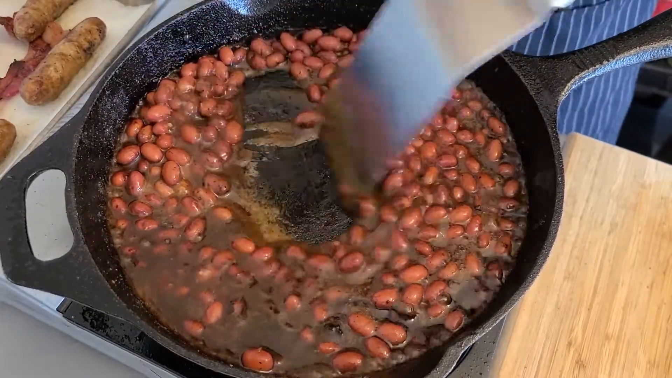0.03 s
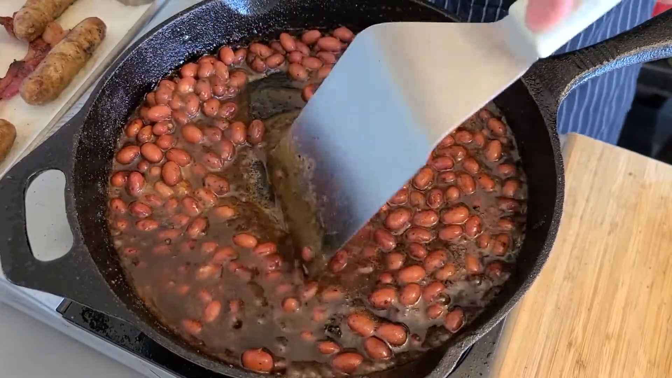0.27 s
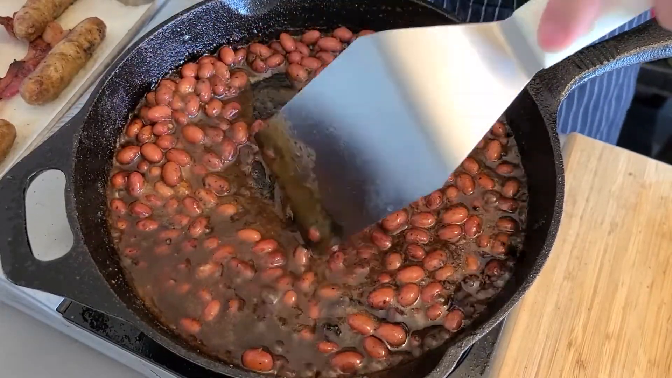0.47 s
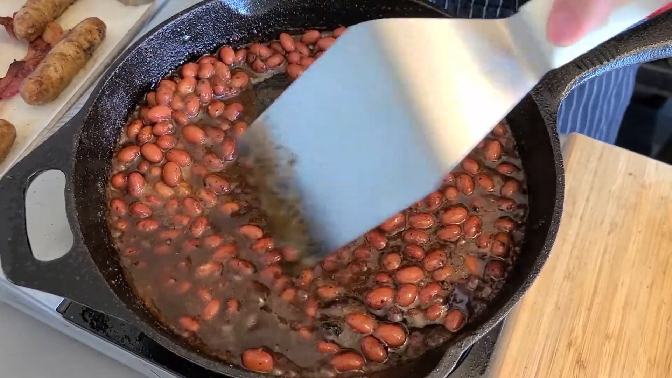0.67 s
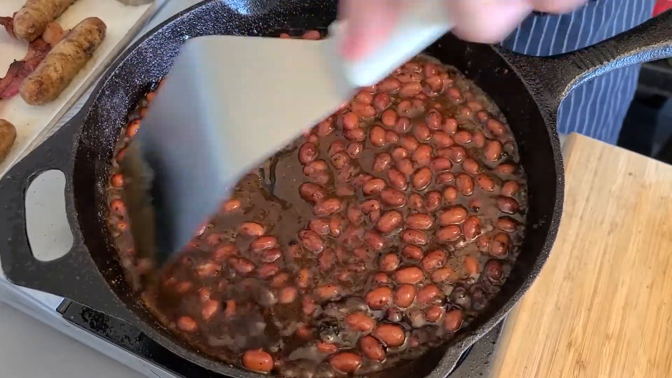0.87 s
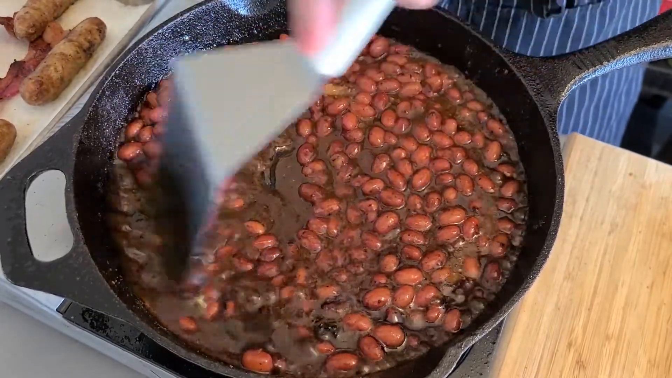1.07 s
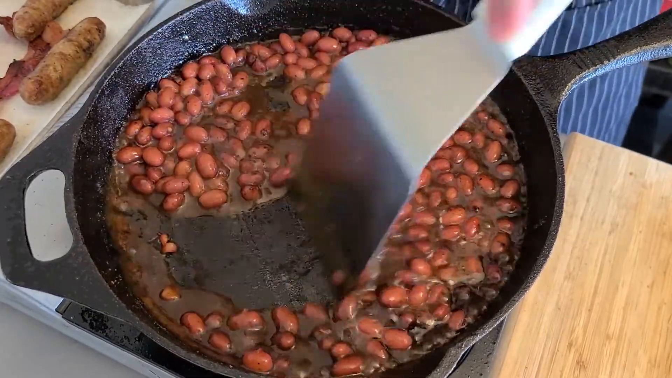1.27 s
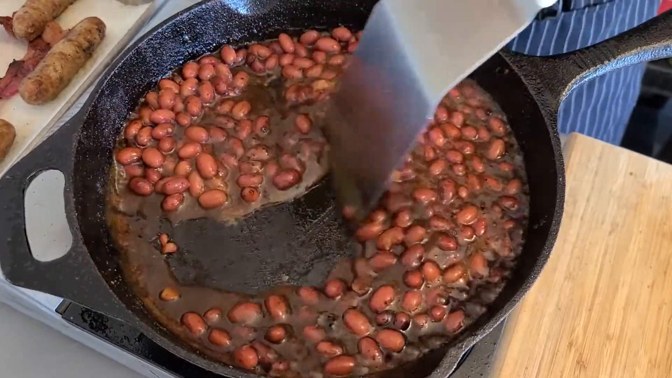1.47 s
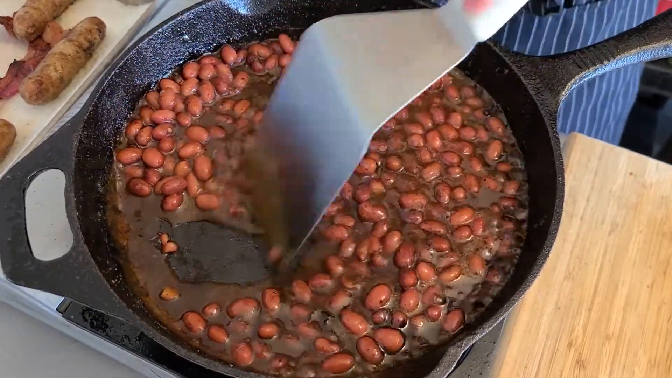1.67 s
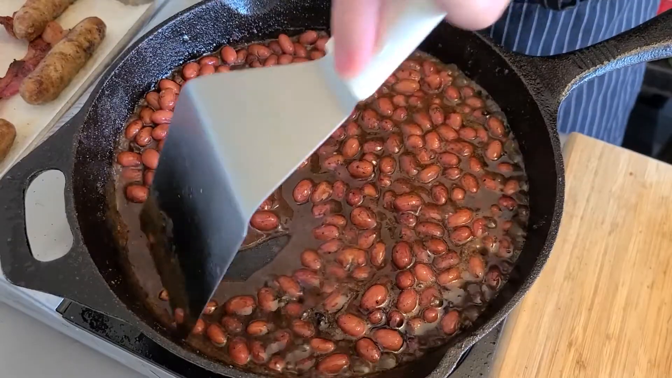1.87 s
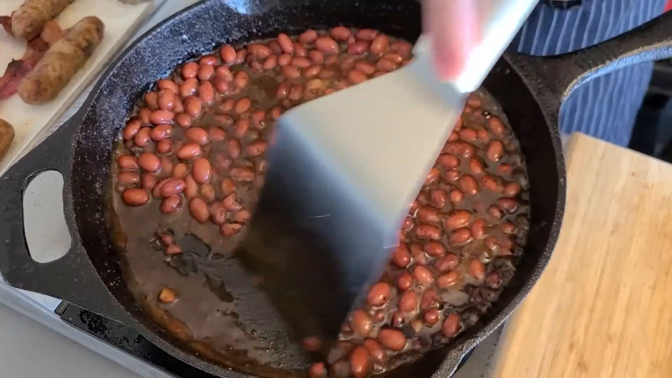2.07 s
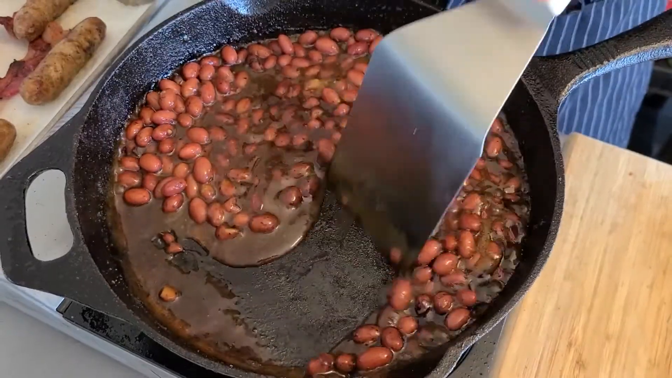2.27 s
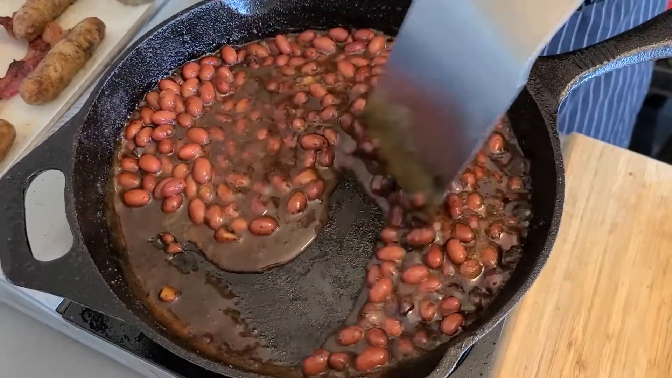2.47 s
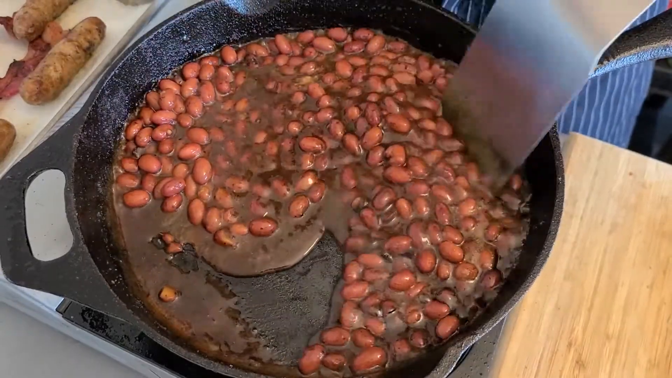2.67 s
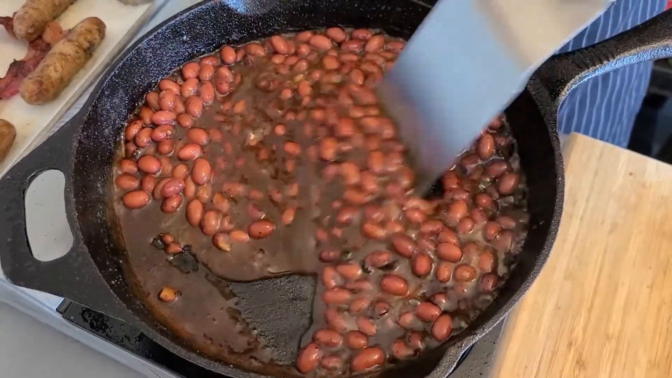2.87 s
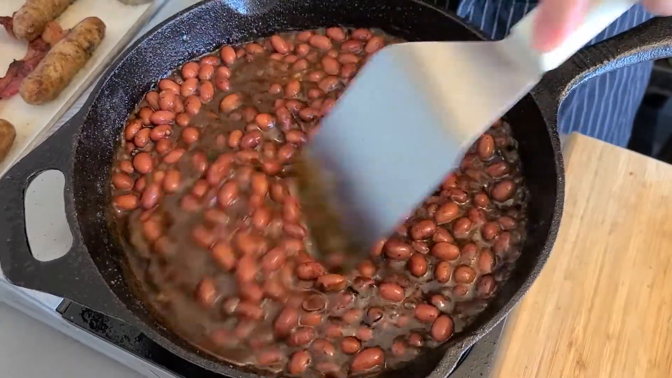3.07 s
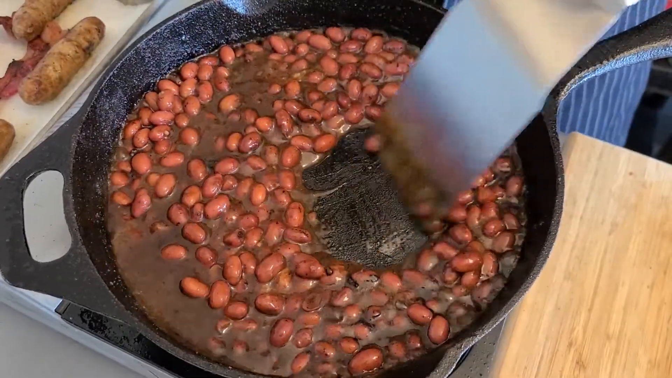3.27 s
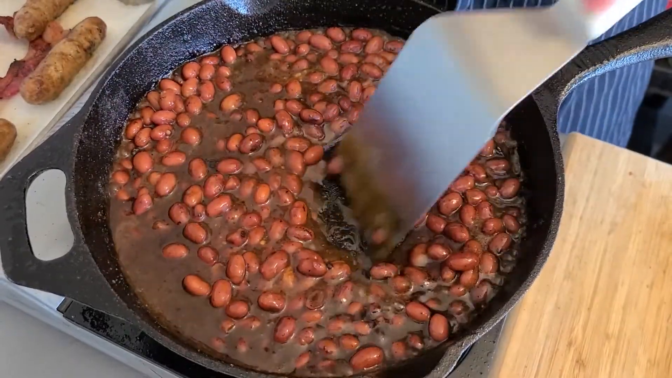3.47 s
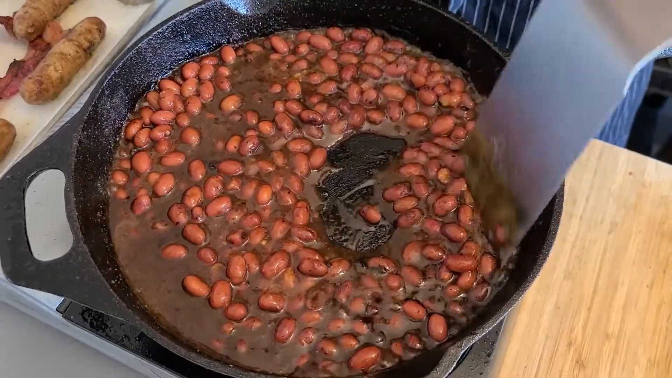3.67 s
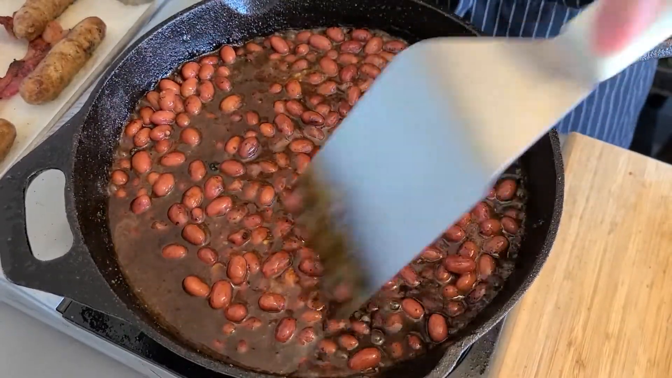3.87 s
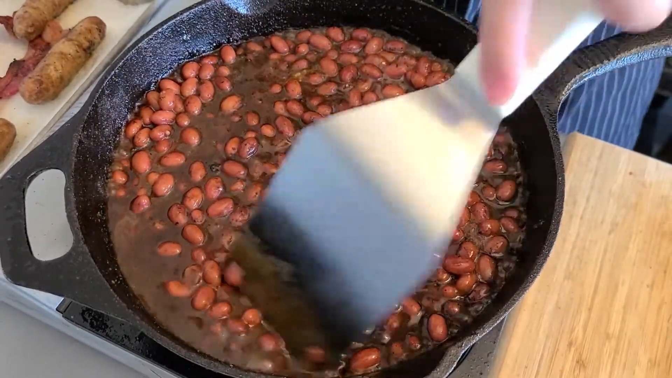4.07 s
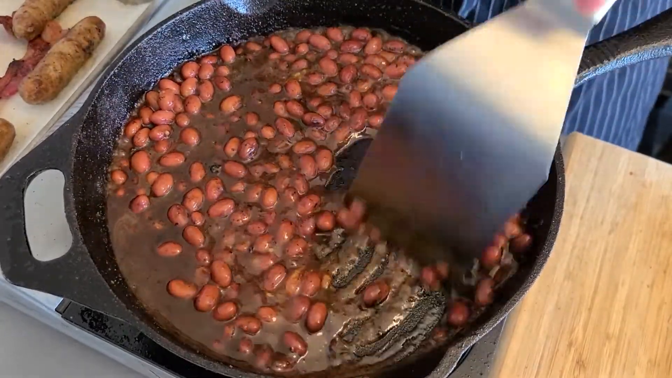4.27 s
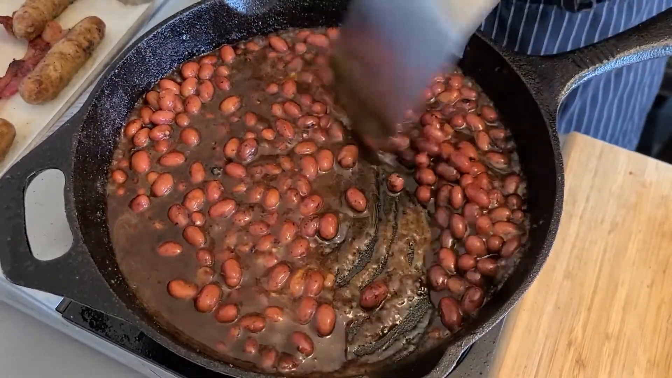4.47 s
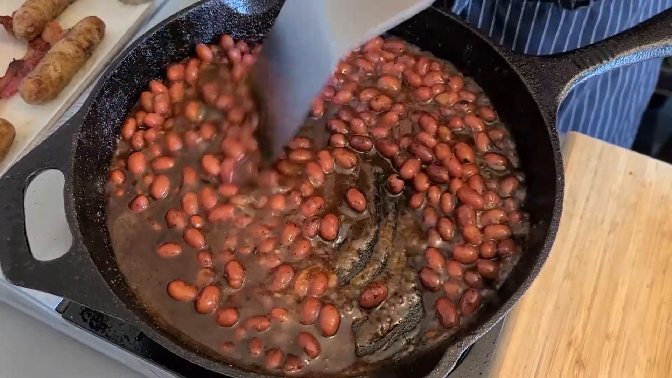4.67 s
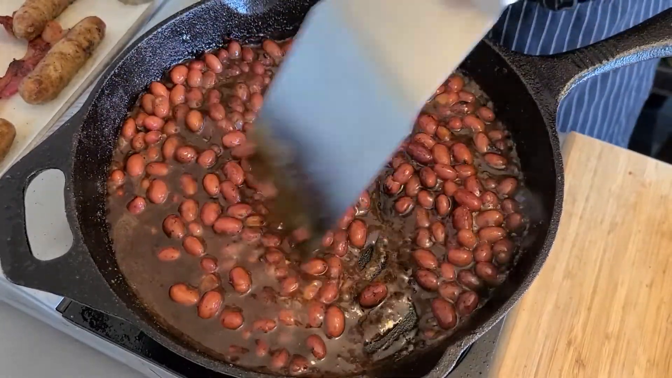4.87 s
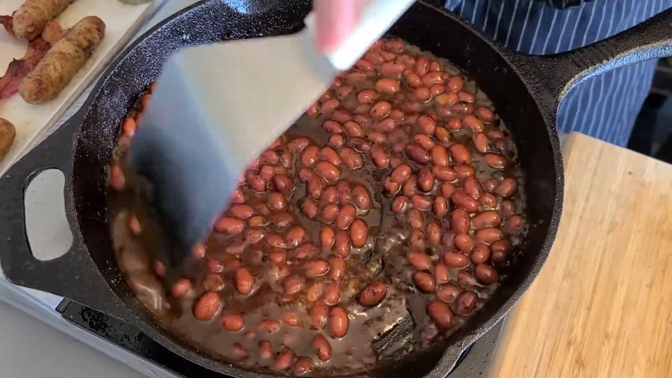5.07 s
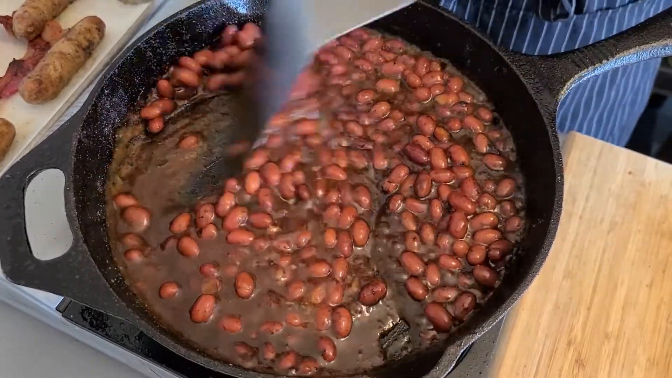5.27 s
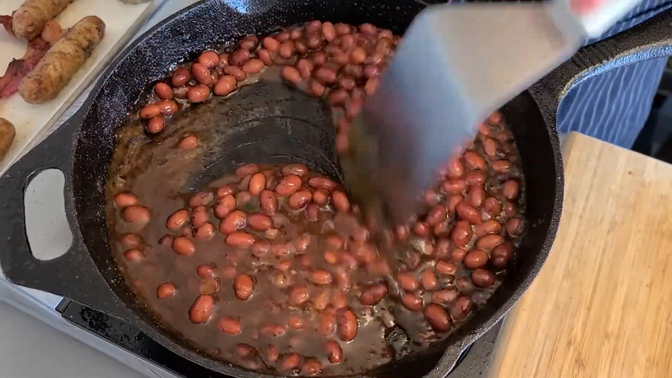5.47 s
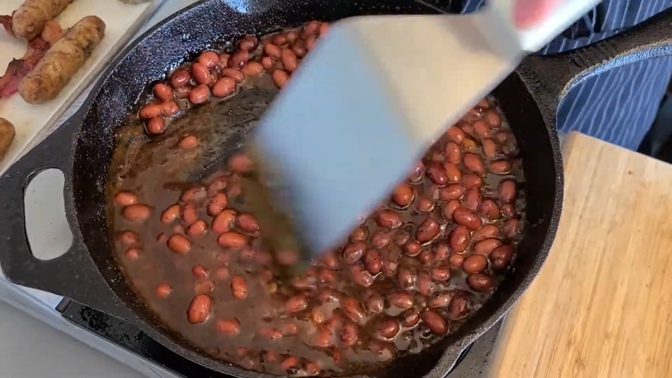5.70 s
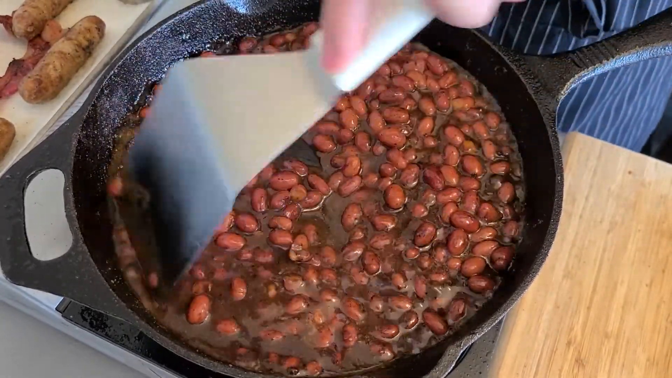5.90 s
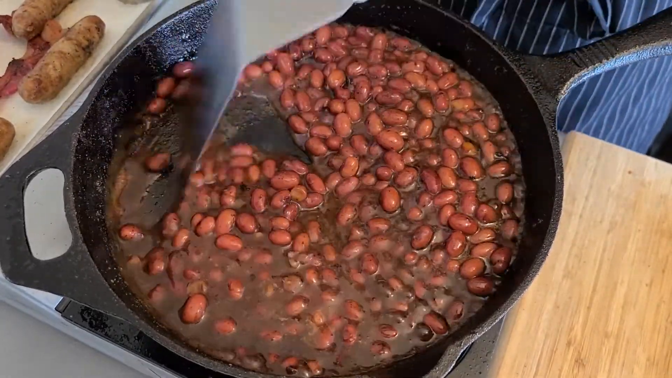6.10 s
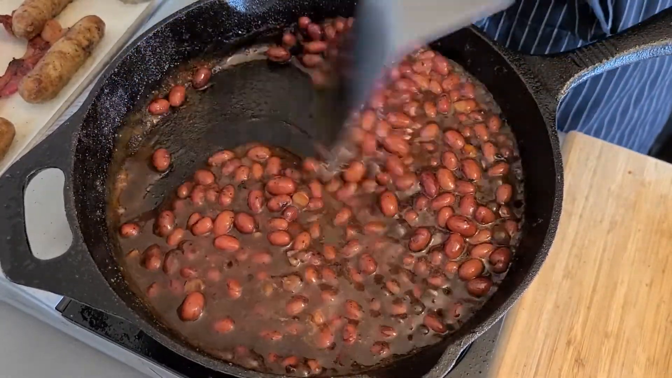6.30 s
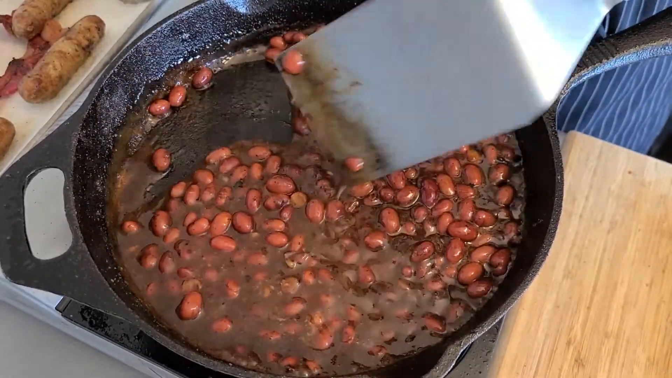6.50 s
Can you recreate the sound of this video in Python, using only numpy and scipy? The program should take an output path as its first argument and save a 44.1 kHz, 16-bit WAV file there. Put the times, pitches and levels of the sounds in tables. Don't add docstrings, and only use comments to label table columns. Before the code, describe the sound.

A thin steel spatula scrapes and knocks a heavy cast-iron skillet of saucy beans in short rough strokes, over soft hiss and faint hum.

```python
import sys
import numpy as np
from scipy import signal
from scipy.io import wavfile
from scipy.ndimage import uniform_filter1d

SR = 44100
rng = np.random.default_rng(int(sys.argv[2]) if len(sys.argv) > 2 else 0)


def convert_level_to_amplitude(level_db):
    exponent = np.asarray(level_db, float) / 20
    return 10 ** exponent


def transcribe(signal):
    frames = np.atleast_2d(signal).T
    limited = np.clip(frames, -1, 1)
    pcm = np.round(limited * 32767).astype(np.int16)
    wavfile.write(sys.argv[1], SR, pcm)


N = 288414

# pitch_hz, level_db (per Hz)
HISS_COLOUR = [(20, -64), (55, 10.5), (86, -13), (121, -17.5), (150, -11.5), (240, -17.5), (700, -18.5),
               (1200, -21.5), (3000, -24), (7600, -25.5), (9000, -34), (12000, -29.5), (15700, -31.5)]
# pitch_hz, likeness (0 to 1)
HISS_LIKENESS = [(60, 1), (110, 0.6), (200, 1), (380, 0.31), (700, 0.16), (1290, 0.052), (2380, 0.05),
                 (4400, 0.033), (8120, 0.39), (15000, 1)]
# pitch_hz, level_db
HUM_PARTIALS = [(59.2, -48), (118.4, -51)]
# pitch_hz, width_hz, level_db
BURNER_WHISTLE = [(6915, 14, -60.5), (6965, 30, -73), (6520, 40, -78)]
# pitch_hz, t60_s
KITCHEN_DECAY = [(300, .32), (1000, .36), (3500, .36), (8000, .27), (15000, .22)]
# pitch_hz, width_hz, level_db
GRATE_MODES = [(160, 50, -5), (215, 45, 0), (280, 60, -5), (350, 70, -8)]
# peak_s, hold_s, level_db
PAN_ROCKS = [(1.226, 0.013, -27.5), (1.93, 0.045, -40.5), (2.042, 0.047, -37), (2.109, 0.024, -29.5),
             (2.324, 0.017, -39), (2.79, 0.15, -45.5), (3.172, 0.013, -41), (3.338, 0.042, -45.5),
             (4.152, 0.1, -41), (4.363, 0.076, -47.5), (5.343, 0.024, -47), (5.94, 0.06, -47),
             (6.055, 0.043, -46.5), (6.3, 0.028, -46.5)]
# pitch_hz, width_hz, level_db
PAN_MODES = [(410, 50, -21), (530, 55, -13), (560, 50, -12), (590, 45, -6), (620, 38, 0), (650, 45, -5),
             (710, 50, -5), (745, 50, -7)]
# pitch_hz, width_hz, level_db
RIM_MODES = [(1090, 45, -1), (1170, 50, -2), (1270, 40, 0), (1405, 55, 0), (1530, 60, -4), (1680, 60, -5),
             (1840, 45, -2), (2020, 55, -3), (2290, 60, -6), (2450, 60, -9)]
# pitch_hz, width_hz, level_db
BLADE_MODES = [(2680, 120, -3), (3200, 140, 0), (3660, 100, -6), (3900, 100, -6), (4030, 100, -5),
               (4280, 100, -7), (4800, 150, -7), (5300, 120, -1), (6050, 200, -10), (7040, 150, -2)]
# pitch_hz, width_hz, level_db
EDGE_MODES = [(8230, 280, 0), (10100, 300, -5), (11700, 300, -3), (12250, 350, -2), (14800, 900, -5)]
# pitch_hz, level_db (per Hz)
SMALL_MODES = [(180, -10.5), (300, -72.5), (627, 43), (863, -44), (1110, 0), (2480, -0.5), (7130, 1),
               (9490, -31), (12000, -23.5), (15200, -39.5), (16500, -95)]
SMALL_MODES_DB = [-18, -6.5, -4.5, -5]
BAND_BORDERS = [300, 900, 2500, 7800, 17000]
RIGHT_LAGS = [3, 4, 2, 0]
# start_s, first_hz, second_hz, third_hz
CONTACT_PLACES = np.array([ (0, 650, 1400, 2000), (.93, 700, 1530, 1900), (1.09, 3200, 1405, 2020),
                  (1.165, 610, 2020, 1400), (1.42, 590, 1130, 410), (1.87, 620, 700, 7040),
                  (1.965, 620, 1300, 1840), (2.075, 590, 1170, 7040), (2.21, 530, 1405, 5300),
                  (2.29, 590, 1170, 3200), (2.7, 630, 2600, 2680), (2.865, 660, 1840, 2680),
                  (2.96, 650, 1170, 3200), (3.13, 660, 1270, 1270), (3.26, 660, 2290, 3200),
                  (4.0, 640, 2600, 2680), (4.095, 560, 1270, 5300), (4.19, 710, 1200, 5300),
                  (4.27, 745, 4030, 5300), (4.35, 1200, 5300, 5100), (4.57, 650, 1130, 1130),
                  (4.6, 650, 3230, 3330), (5.11, 1405, 1470, 2020), (5.19, 1470, 1840, 1950),
                  (5.325, 410, 1270, 620), (5.7, 1270, 1300, 2020), (5.91, 620, 1270, 2020),
                  (6.02, 730, 410, 1680), (6.115, 410, 1405, 1500), (6.225, 410, 1840, 1900)])
# start_s, knock_db, drag_s, pressure_db, sauce_db
EDGE_LANDINGS = [(0.0, -17, 0.0033, -26.5, 1.5), (0.9399, -25, 0.015, -25.5, 6.5),
                 (1.0974, -16.5, 0.0034, -27.5, 2.5), (1.1568, -20.5, 0.017, -39, 14),
                 (1.8831, -24, 0.032, -21.5, 7.5), (2.7891, -19.5, 0.023, -27.5, 22.5),
                 (4.0173, -15.5, 0.01, -32, 5), (4.3615, -23, 0.024, -43, 8.5),
                 (4.583, -6.5, 0.069, -17, 19), (5.1267, -26.5, 0.0057, -36.5, 0),
                 (5.3293, -32, 0.018, -42, -3.5), (5.3527, -21, 0.046, -27, 4),
                 (5.9234, -23, 0.014, -25.5, 1), (6.0272, -23, 0.0067, -17.5, 10)]
# start_s, rise_s, hold_s, pressure_db, sauce_db
HAND_SWEEPS = [(-0.001, 0.028, 0.058, -23, 23), (1.167, .04, 0.03, -17, 6.5),
               (1.413, 0.082, 0.005, -21, 26), (1.525, 0.021, 0.024, -34.5, 22),
               (1.945, 0.067, 0.13, -20.5, 9.5), (2.185, 0.02, 0.052, -31.5, 18.5),
               (2.282, 0.041, 0.016, -26.5, 12), (2.85, 0.09, 0.058, -16, 12.5),
               (3.129, 0.038, 0.01, -25.5, 1.5), (3.285, 0.043, 0.027, -15, 20),
               (3.312, 0.044, 0.019, -13.5, 7), (3.456, 0.016, 0.028, -38, 15),
               (4.069, 0.07, 0.087, -22.5, 9), (4.19, .015, .06, -34.5, 15),
               (4.262, 0.013, 0.069, -35.5, 9.5), (4.362, 0.016, 0.057, -26.5, 13.5),
               (4.59, 0.0074, 0.057, -23, 10.5), (5.164, 0.042, 0.035, -37, -1.5),
               (5.403, 0.052, 0.076, -29, 3), (5.51, .02, 0.018, -28, 35), (6.032, 0.018, 0.032, -20.5, 30),
               (6.1, 0.029, 0.076, -25, 6), (6.215, 0.037, 0.053, -27, 6),
               (6.292, 0.0089, 0.025, -26, 17.5)]
# start_s, rise_s, hold_s, pressure_db, sauce_db
MORE_SWEEPS = [(0.44, 0.015, 0.033, -53, 20), (0.973, 0.013, 0.044, -34.5, 13),
               (1.359, 0.045, 0.037, -38, 7.5), (1.64, 0.016, 0.011, -52, 21),
               (2.758, 0.027, .005, -36.5, 13), (2.948, 0.014, 0.014, -17, 4.5),
               (3.066, 0.018, 0.067, -44.5, 8.5), (4.661, 0.027, 0.025, -25, 21),
               (5.28, 0.027, .02, -41, 16), (5.75, 0.016, 0.076, -60, 6), (5.983, 0.034, .005, -27.5, 3)]
# start_s, knock_db, sauce_db
EDGE_SNAGS = [(1.1824, -31, 0), (1.487, -5.5, 36), (2.0063, -11, 19), (2.0324, -13, 9.5), (2.2504, -35, 6),
              (2.2982, -44, -4), (2.835, -40, 10), (3.1497, -21.5, 8), (3.275, -17.5, 32),
              (3.308, -8.5, 26), (4.0914, -62, -2), (4.1205, -19.5, 5), (4.1934, -11, 8.5),
              (4.2014, -37.5, -17), (4.2153, -15.5, 7), (4.2274, -13.5, 6.5), (4.2434, -32, -12),
              (4.3044, -42, 17), (4.3844, -32, 4), (4.6074, -44, 5), (4.9362, -42.5, 12),
              (5.2074, -33.5, -7), (5.2434, -35.5, -5), (6.0404, -17, 11), (6.0975, -22, 0.5),
              (6.1234, -26.5, -1), (6.212, -17, 18), (6.25, -37.5, -11), (6.2736, -12.5, 19),
              (6.333, -54, -2)]
BARE_DRAG_DB = [-4.06, -0.1, 2, -2]
BARE_KNOCK_DB = [-5.9, 14.5, 5.9, 0.5]
LOSS_PER_SAUCE_DB = [0, .45, .75, 1.2]


def evened(x):
    return x / np.sqrt(np.mean(x ** 2) + 1e-20)


def read(points, hz):
    f, value = np.transpose(points)
    return np.interp(np.log(hz + 1), np.log(f + 1), value)


def ring(x, hz, width):
    r = np.exp(-np.pi * width / SR)
    pole = r * np.exp(2j * np.pi * hz / SR)
    return np.sqrt(2 * (1 - r ** 2)) * signal.lfilter([1], [1, -pole], x)


def causal(gain, size):
    log_gain = np.log(np.maximum(np.r_[gain, gain[-2:0:-1]], 1e-5))
    taps = np.fft.ifft(np.exp(np.conj(signal.hilbert(log_gain)))).real[:size]
    return taps / np.linalg.norm(taps)


def hiss():
    frames, hz = N // 256 + 5, np.fft.rfftfreq(1024, 1 / SR)
    a, b, c, d, patches = rng.standard_normal((frames, 513, 5)).T
    patches = uniform_filter1d(patches, size=12, axis=0)
    patches = evened(uniform_filter1d(patches, size=14, axis=1))
    same = np.clip(read(HISS_LIKENESS, hz), -1, 1)[:, None]
    left = a + 1j * b
    right = same * left + np.sqrt(1 - same ** 2) * (c + 1j * d)
    colour = convert_level_to_amplitude(read(HISS_COLOUR, hz))
    patchy_colour = colour[:, None] * convert_level_to_amplitude(1.7 * patches)
    x = signal.istft(np.array([left, right]) * patchy_colour, nperseg=1024, noverlap=768)[1][:, :N]
    middle = (hz > 200) & (hz < 6000)
    whole_over_middle = np.sqrt(np.sum(colour ** 2) / np.sum(colour[middle] ** 2))
    return convert_level_to_amplitude(-54.5) * evened(x) * whole_over_middle


def appliances():
    t = np.arange(N) / SR
    waver = 1 + 0.25 * evened(ring(rng.standard_normal(N), 0, 6.6).real)
    hum = sum(convert_level_to_amplitude(db - 4.5) * np.sin(2 * np.pi * (f * t + rng.random())) for f, db in HUM_PARTIALS)
    whistle = np.zeros(N, complex)
    for f, width, db in BURNER_WHISTLE:
        twice_rung = ring(ring(rng.standard_normal(N), f, width), f, width)
        whistle += convert_level_to_amplitude(db) * twice_rung * np.sqrt(np.pi * width / SR)
    ports = [(whistle * np.exp(.6j)).real, (whistle * np.exp(-.6j)).real]
    return hum * waver + np.array(ports)


def simmer():
    pops_per_s, sizes = 120, 8
    t, out = np.arange(100) / SR, np.zeros(N)
    for f in np.geomspace(4000, 15000, num=sizes):
        bursts = rng.random(N) < pops_per_s / sizes / SR
        strength = convert_level_to_amplitude(2.5 * np.minimum(rng.exponential(1, N), 3)) * bursts
        pop = np.sin(2 * np.pi * f * t) * np.exp(-t * f / 2.5)
        out += signal.oaconvolve(strength, pop)[:N]
    return convert_level_to_amplitude(-66) * evened(out)


def kitchen(x):
    taps = np.zeros((2, SR // 2))
    at = np.arange(140, SR // 2 - 20, 20) + rng.integers(0, 20, (2, (SR // 2 - 141) // 20))
    np.put_along_axis(taps, at, rng.choice([-1., 1.], at.shape), axis=1)
    taps[1] = 0.061 * taps[0] + taps[1]
    hz, t, z = signal.stft(taps, SR, nperseg=256)
    z[1] = np.where(hz[:, None] < 800, 0.5 * z[0] + 0.48 * z[1], z[1])
    decay = convert_level_to_amplitude(-60 * t / read(KITCHEN_DECAY, hz)[:, None])
    tail = signal.istft(z * decay, SR, nperseg=256)[1]
    tail = tail / np.linalg.norm(tail, axis=1, keepdims=True)
    return signal.fftconvolve(x[None], tail, axes=1)[:, :N]


def push(start, rise, hold, lean_db, lift_db_per_s):
    at = np.arange(round(start * SR), min(round((start + rise + hold + .3) * SR), N))
    t = at / SR - start
    onset = np.minimum(4 * t / rise, 1)
    lean = -lean_db * np.clip(1 - t / rise, 0, 1)
    lift = -lift_db_per_s * np.maximum(t - rise - hold, 0)
    return at, onset * convert_level_to_amplitude(lean + lift)


def thud():
    rise_s = 0.077
    shake = np.zeros(N)
    for peak, hold, db in PAN_ROCKS:
        at, gain = push(peak - rise_s, rise_s, hold, lean_db=21.5, lift_db_per_s=257)
        shake[at] += convert_level_to_amplitude(db - 9) * gain
    shake = shake * rng.standard_normal(N)
    rocking = sum(convert_level_to_amplitude(db) * ring(shake, f, width).real for f, width, db in GRATE_MODES)
    return signal.lfilter(*signal.butter(2, 140, "high", fs=SR), rocking)


def pressure():
    power = np.zeros((4, N))
    drags = [(s, 0.001, *rest) for s, _, *rest in EDGE_LANDINGS]
    for start, rise, hold, db, sauce_db in HAND_SWEEPS + MORE_SWEEPS + drags:
        at, gain = push(start, rise, hold, lean_db=14, lift_db_per_s=446.5)
        part_db = db + np.array(BARE_DRAG_DB) - sauce_db * np.array(LOSS_PER_SAUCE_DB)
        power[:, at] += np.outer(convert_level_to_amplitude(part_db), gain) ** 2
    return np.sqrt(power)


def grit():
    clicks_per_s, spread_db, judder_db, judder_hz = 4500, 3.6, 1.3, 90
    size = convert_level_to_amplitude(spread_db * np.minimum(rng.exponential(1, N), 5)) * rng.choice([-1, 1], N)
    judder = signal.lfilter(*signal.butter(2, judder_hz, fs=SR), rng.standard_normal(N))
    clicks = size * (rng.random(N) < clicks_per_s / SR)
    return evened(clicks * convert_level_to_amplitude(judder_db * evened(judder)))


def blows(knocks, k, rattle_s):
    out, t = np.zeros(N + 1000), np.arange(1000) / SR
    envelope = np.exp(-t / rattle_s) * (1 - np.exp(-t / 0.00048))
    for start, db, sauce_db in knocks:
        level_db = db + BARE_KNOCK_DB[k] - LOSS_PER_SAUCE_DB[k] * sauce_db
        rattle = rng.standard_normal(len(t)) * envelope
        out[round(start * SR):][:len(t)] += convert_level_to_amplitude(level_db) * rattle
    return out[:N]


def contact(hz, db, beam, boost_db):
    t = np.arange(0, N, 256) / SR
    places = np.array(CONTACT_PLACES)
    now = places[np.searchsorted(places[:, 0], t, "right") - 1, 1:]
    drift = uniform_filter1d(rng.standard_normal((2, len(t))), size=8)
    wander, swing = evened(uniform_filter1d(drift, size=8))
    favoured = np.exp(-(np.log(now / hz) / .07) ** 2).sum(1)
    weight = convert_level_to_amplitude((boost_db - 0.51 * db) * favoured + 2 * wander - 6.0)
    steps = [weight, np.cos(beam * swing), np.sin(beam * swing)]
    return np.repeat(steps, 256, axis=1)[:, :N]


def main_modes(drive, modes, k):
    beam, boost_db = [.15, .6, .75, .9][k], [5.98, 6.4, 5.1, 7][k]
    total = np.linalg.norm(convert_level_to_amplitude(np.transpose(modes)[2]))
    mid, lean, belly = np.zeros(N), np.zeros(N), 0
    for f, width, db in modes:
        weight, inphase, lead = contact(f, db, beam, boost_db)
        z = convert_level_to_amplitude(db) / total * ring(drive * weight, f, width)
        if k == 0:
            z = ring(z, f, 4 * width) * np.sqrt(2 * np.pi * width / SR)
        if f == PAN_MODES[0][0]:
            belly = convert_level_to_amplitude(-1.5) * z.real
            continue
        mid += z.real * inphase
        lean += z.imag * lead
    return np.array([mid + lean, mid - lean]), belly


def small_modes(drive, k):
    hz, own_db = np.fft.rfftfreq(4096, 1 / SR), [1.5, 3, 3, 3.5][k]
    inside = 1. * (hz > BAND_BORDERS[k]) * (hz <= BAND_BORDERS[k + 1])
    band = uniform_filter1d(inside, size=31) + .002
    turn = 2 * np.pi * 1.3 * np.arange(N) / SR
    out = np.zeros((2, N))
    for share in (np.cos(turn), np.sin(turn)):
        both, left, right = evened(uniform_filter1d(rng.standard_normal((3, len(hz))), size=8))
        taps = []
        for own in (left, right):
            gain = convert_level_to_amplitude(read(SMALL_MODES, hz) + 1.5 * both + own_db * own) * band
            taps.append(causal(gain, size=1024))
        out += signal.oaconvolve((drive * share)[None], taps, axes=1)[:, :N]
    return convert_level_to_amplitude(SMALL_MODES_DB[k]) * out


def skillet():
    drag, clicks = pressure(), grit()
    knocks = EDGE_SNAGS + [(s, db, sauce_db) for s, db, _, _, sauce_db in EDGE_LANDINGS]
    out, belly = np.zeros((2, N)), 0
    for k, modes in enumerate([PAN_MODES, RIM_MODES, BLADE_MODES, EDGE_MODES]):
        rattle_s = [0.013, 0.00081, 0.0021, 0.0036][k]
        drive = clicks * drag[k] + blows(knocks, k, rattle_s)
        drive = signal.lfilter(*signal.butter(2, 1.2 * BAND_BORDERS[k + 1], fs=SR), drive)
        part, lowest = main_modes(drive, modes, k)
        belly = belly + lowest
        part += small_modes(drive, k)
        out += [part[0], np.roll(part[1], RIGHT_LAGS[k])]
    out = signal.sosfilt(signal.butter(6, 505, "high", fs=SR, output="sos"), out)
    return (out + belly) * convert_level_to_amplitude([[.6], [-.6]])


def scene():
    near = skillet() + thud()
    echo = convert_level_to_amplitude(-5.5) * kitchen(near.mean(0))
    return near + echo + hiss() + appliances() + simmer()


def low_pass(x):
    return signal.sosfilt(signal.butter(12, 16750, fs=SR, output="sos"), x)


def record(dry):
    lowpass = signal.firwin(1023, 15720, window=("kaiser", 9), fs=SR)
    limited = signal.oaconvolve(dry, lowpass[None], "same")
    return low_pass(limited)


dry = scene()
out = record(dry)
transcribe(out)
```